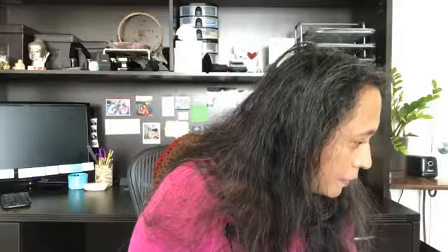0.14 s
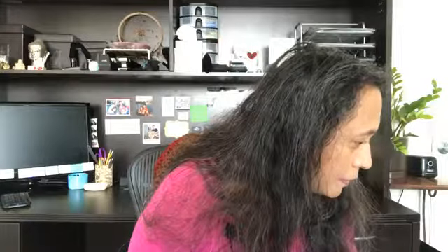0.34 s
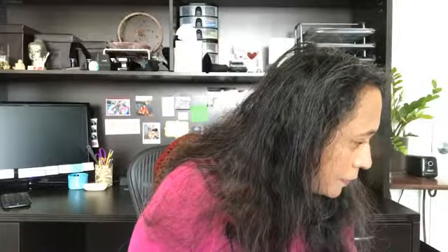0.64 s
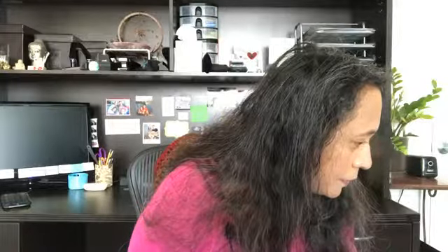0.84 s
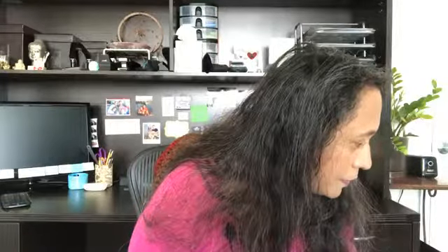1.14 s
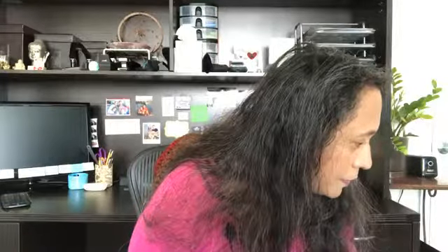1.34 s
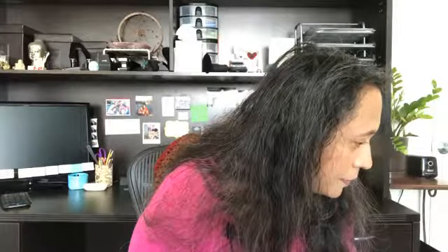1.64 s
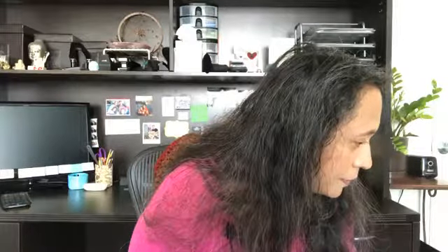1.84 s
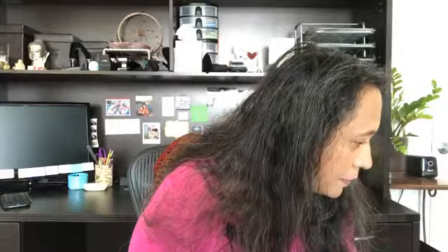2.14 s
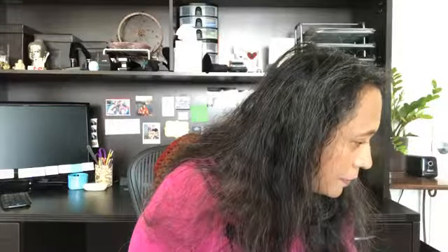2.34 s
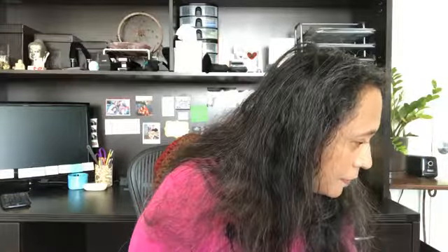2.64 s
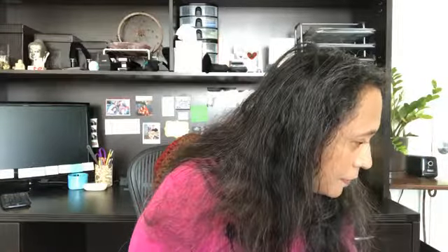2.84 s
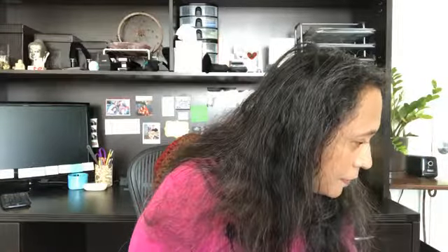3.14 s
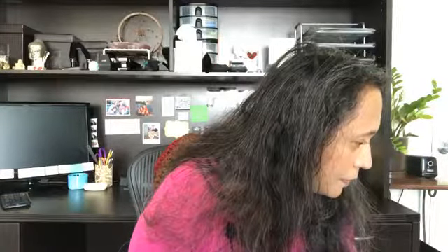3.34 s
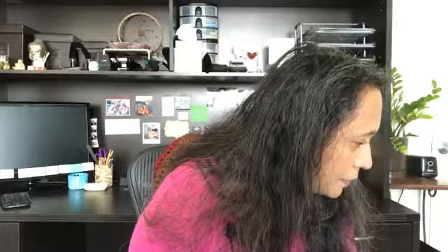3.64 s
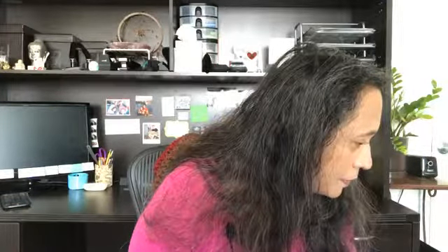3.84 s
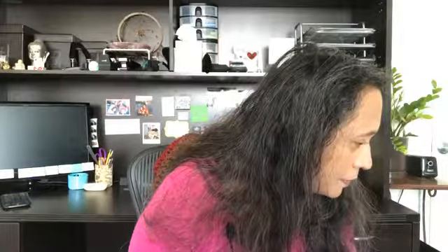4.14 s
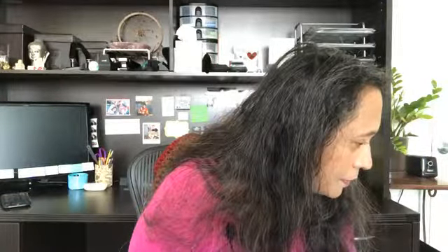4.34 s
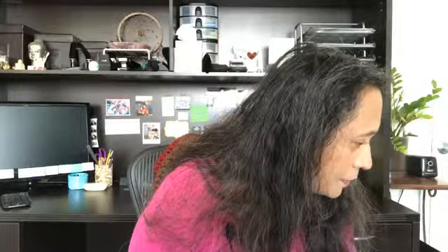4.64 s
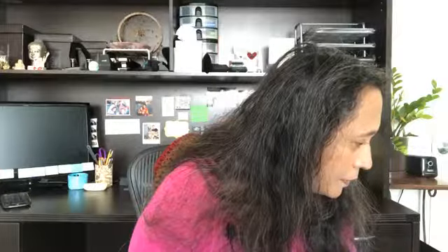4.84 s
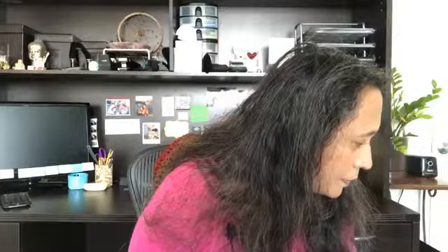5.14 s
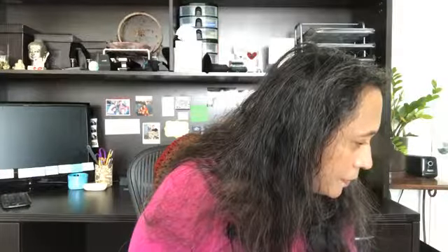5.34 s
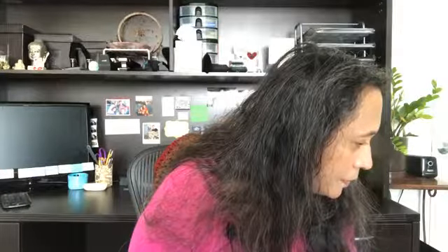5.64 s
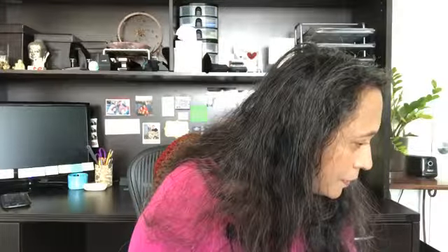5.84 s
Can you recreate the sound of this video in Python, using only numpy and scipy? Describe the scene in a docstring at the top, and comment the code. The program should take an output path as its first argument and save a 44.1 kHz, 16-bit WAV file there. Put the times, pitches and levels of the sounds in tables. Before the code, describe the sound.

In a quiet office, a low building rumble and soft fan hum run throughout, with a very faint electronic whine and sizzle. A deep drone dies away at the start. A computer mouse close to the microphone is then clicked three times, about two seconds apart, each a crisp plastic snap down and back up with a slight room echo. A few faint dry ticks fall around the clicks.

```python
"""A quiet office: a building rumbles, a fan hums, a thin whine swings in pitch and electronics sizzle
throughout. A deep drone dies away in the first second, and faint ticks come now and then. At about 1, 3 and 5
seconds a computer mouse is clicked close by. Each press snaps the plastic shell, pings the switch spring and
knocks on the desk. A tenth of a second later the button snaps back up with far less ring. The walls return both
snaps."""
import sys
import numpy as np
from scipy import signal
from scipy.fft import rfft, irfft, next_fast_len
from scipy.io import wavfile
from scipy.ndimage import uniform_filter1d

SR = 44100
rng = np.random.default_rng(int(sys.argv[2]) if len(sys.argv) > 2 else 0)


def unload_wav(signal):
    """Save mono or channel-first audio to the path in sys.argv[1] as 16-bit WAV at rate SR, clipped to [-1, 1]."""
    wavfile.write(
        sys.argv[1],
        SR,
        np.round(np.clip(np.atleast_2d(signal).T, -1, 1) * 32767).astype(np.int16),
    )


N = 264688
TIME = np.arange(N) / SR

# The button going down, and coming back up. A fade time is how long a sound takes to drop by 60 dB.
# (time [s], snap level [dB], spring level [dB], knock level [dB], rise time [s], fade time [s])
BUTTON_DOWN = [(1.0368, -25.5, -41, -31.5, .0002, .01), (3.0423, -27, -40, -32, .0002, .012),
               (4.9691, -26.5, -40, -31.5, .0002, .01)]
BUTTON_UP = [(1.1295, -22, -57, -31, .00005, .006), (3.1559, -22.5, -68, -31.5, 0.000042, 0.0074),
             (5.0431, -23, -67, -29.5, .0004, 0.0093)]
# How the plastic shell colours the snap going down, and coming up: (frequency [Hz], boost [dB])
SHELL_DOWN = [(150, -12.5), (400, -12), (1300, -13), (2700, -11.5), (3400, -4.5), (4100, -10), (5400, -4),
              (6900, -3.5), (7700, 9), (8800, -4.5), (9700, -1), (11300, -14), (11800, 1), (13000, -7),
              (14000, -8), (15700, -25)]
SHELL_UP = [(150, -16.5), (1300, -14.5), (2950, -14), (3330, -1.5), (3700, -6), (4150, -4), (4700, -8.5),
            (5600, -9.5), (6700, -3), (7950, 5.5), (8250, 2), (8580, 4.5), (8950, -0.5), (9500, -3.5),
            (11000, -10.5), (12400, -2.5), (13100, -2.5), (14200, -4), (15100, -1.5), (15750, -26)]
def button(snaps, shell, alike=0.91, size=4096):
    """Each snap rattles the shell in much the same way, a quick finger more crisply than a slow one."""
    out = np.zeros(N)
    usual = rng.standard_normal(size)
    for start, db, _, _, rise_s, fade_s in snaps:
        contacts = alike * usual + np.sqrt(1 - alike ** 2) * rng.standard_normal(size)
        add(out, start, amp(db) * snap(contacts, shell, fade_s, rise_s))
    return out


def snap(contacts, colour, fade_s, rise_s=.00003):
    """A burst of tiny hits builds up, dies away and takes on the colour of the thing that is hit."""
    size = len(contacts)
    t = np.arange(size) / SR
    rattle = np.fft.fft(contacts * (1 - np.exp(-t / rise_s)) * amp(-60 * t / fade_s))
    rattle /= np.sqrt(uniform_filter1d(abs(rattle) ** 2, 35, mode="wrap"))  # even out chance peaks
    log_gain = np.log(amp(look_up(colour, abs(np.fft.fftfreq(size, 1 / SR)))))
    response = np.exp(np.conj(signal.hilbert(log_gain)))  # rings after a hit, never before
    sound = np.fft.ifft(rattle * response).real
    return unit(sound * (1 - t / t[-1]) ** 2) / np.sqrt(size)


# The notes of the switch spring: (pitch [Hz], level [dB], fade time [s])
SPRING_NOTES = [(7260, -3.5, 0.051), (7140, -20.5, 0.3), (7256, -14, 0.22), (7290, -25, 0.33),
                (11620, -21, 0.071), (11937, -23, 0.12), (11800, -21, 0.12), (12683, -25, .22),
                (12916, -41, .22)]
def spring(damped_fade_s=.02):
    """A press rings the spring, whose close notes throb. The release stops it with a fainter ping."""
    out, ping = np.zeros(N), ring(SPRING_NOTES)
    t = TIME[:len(ping)]
    for (down, _, down_db, *_), (up, _, up_db, *_) in zip(BUTTON_DOWN, BUTTON_UP):
        since_release = np.maximum(t - (up - down), 0)
        add(out, down, amp(down_db - 60 * since_release / damped_fade_s) * ping)
        add(out, up, amp(up_db) * ping)
    return out


# The notes of the hollow mouse on the desk: (pitch [Hz], level [dB], fade time [s])
BODY_NOTES = [(194.7, -29.5, 0.065), (278, -37, 0.048), (765, -25.5, 0.017), (885, -20.5, 0.019)]
def knocks(rise_s=0.00019):
    """Every snap also knocks the hollow mouse and the desk, which take a moment to answer."""
    out, knock = np.zeros(N), ring(BODY_NOTES)
    knock *= 1 - np.exp(-TIME[:len(knock)] / rise_s)
    for start, _, _, knock_db, _, _ in BUTTON_DOWN + BUTTON_UP:
        add(out, start, amp(knock_db) * knock)
    return out


# The switch's little peg slips just before a snap: (time [s], level [dB], length [s])
PEG_SLIPS = [(1.0337, -44.5, 0.0028), (3.0403, -47, 0.0031), (3.1515, -45.5, 0.0034),
             (5.0396, -44.5, 0.0018), (5.042, -49, 0.0015)]
def slips(spring_hz=7280, scrape=0.55):
    """Rubbing swells for a moment and sets the spring singing."""
    out = np.zeros(N)
    rub = tone(spring_hz) + scrape * noise(SHELL_UP)
    for start, db, length in PEG_SLIPS:
        progress = np.clip((TIME - start) / length, 0, 1)
        out += amp(db) * rub * np.sin(np.pi * progress ** 2.7)
    return out


# Faint ticks around the clicks: (time [s], level [dB], pitch [Hz], spread in pitch [Hz])
FAINT_TICKS = [(0.135, -48.5, 4250, 1400), (0.202, -41, 4400, 5000), (1.4277, -41.5, 5200, 2400),
               (1.6702, -47.5, 3400, 4500), (1.794, -41, 4250, 2000), (2.4100, -42.5, 4400, 1100),
               (3.8867, -51, 4500, 1400), (5.1903, -48, 4100, 2300)]
def ticks(fizz_db=-11, fizz_hz=10000, fizz_width_hz=4000):
    """Small dry ticks, each ringing briefly at its own pitch under a little fizz."""
    out, hz = np.zeros(N), np.geomspace(100, 18000, 200)
    fizz = amp(fizz_db) / (1 + (2 * (hz - fizz_hz) / fizz_width_hz) ** 2)
    for start, db, pitch, width in FAINT_TICKS:
        peak = 1 / (1 + ((hz / pitch - pitch / hz) * pitch / width) ** 2)
        colour = np.c_[hz, 20 * np.log10(np.hypot(peak, fizz))]
        add(out, start, amp(db) * snap(rng.standard_normal(4096), colour, fade_s=0.014))
    return out


def bright_echo(sound, echo_db, delay_s=.0082, beam_hz=9450, width_hz=2100):
    """A hard surface nearby throws the click back, brightest where the button beams its treble."""
    out = np.zeros(N)
    beamed = signal.lfilter(*signal.iirpeak(beam_hz, beam_hz / width_hz, fs=SR), sound)
    add(out, delay_s, amp(echo_db) * (sound + 0.97 * beamed))
    return out


# Echoes from wall, ceiling and shelves: (delay [s], bass strength [ratio], treble strength [ratio])
ROOM_ECHOES = [(.0013, 0.09, 0.082), (.0048, 0.28, .05), (0.015, 0.41, 0.091), (0.0185, 0.47, .2),
               (0.0209, .6, .27)]
# How long the room keeps sounding: (frequency [Hz], fade time [s])
ROOM_FADE = [(200, 0.43), (900, 0.34), (4000, 0.31), (8000, 0.31), (13000, 0.21), (16000, 0.15)]
# The colour of that lingering sound: (frequency [Hz], boost [dB])
ROOM_COLOUR = [(200, 3), (650, -2), (1400, 1), (3200, -4), (4500, -2.5), (8000, -4), (9700, 3), (12600, 7),
               (14000, -1)]
def room(sound, tail_db, echo_db, build_s=0.0056, bass_below_hz=2000):
    """The sound arrives directly, then as a few echoes and a fading tail of many blurred together."""
    hz, t, bands = signal.stft(rng.standard_normal(SR // 2), SR, nperseg=256)
    band_db = look_up(ROOM_COLOUR, hz)[:, None] - 60 * t / look_up(ROOM_FADE, hz)[:, None]
    _, tail = signal.istft(bands * amp(band_db), SR, nperseg=256)
    tail *= 1 - np.exp(-(TIME[:len(tail)] / build_s) ** 2)
    out = sound + signal.fftconvolve(sound, amp(tail_db) * tail / np.linalg.norm(tail))[:N]
    bass = signal.lfilter(*signal.butter(1, bass_below_hz, fs=SR), sound)
    for delay, bass_gain, treble_gain in ROOM_ECHOES:
        add(out, delay, amp(echo_db) * (bass_gain * bass + treble_gain * (sound - bass)))
    return out


# Waves bouncing between the walls make some pitches of the whine louder: (pitch [Hz], level [dB])
WHINE_LOUDNESS = [(1922, -87), (1935, -88), (1947, -95), (1961, -101), (1974, -89), (1983, -90.5),
                  (1997, -95.5), (2011, -90.5)]
def whine(middle_hz=1967, swing_hz=44.12, period_s=1.98, lowest_at_s=1.32, flicker_db=2.5):
    """A thin whine swings slowly up and down in pitch while its level flickers."""
    turn = 2 * np.pi * (TIME - lowest_at_s) / period_s
    swing = -np.cos(turn + .13 * (1 - np.cos(turn)))  # climbs faster than it sinks
    pitch = middle_hz + swing_hz * swing
    return amp(look_up(WHINE_LOUDNESS, pitch) + flicker_db * drift(11)) * tone(pitch)


# The sizzle surges up, or sags down: (time [s], length [s], full pitch change [Hz])
SIZZLE_SURGES = [(0.199, .58, 450), (1.24, 1.12, 471), (2.649, .13, 480), (3.3, .2, 299.5),
                 (4.17, .28, 580), (4.548, 0.26, 558.5), (5.33, .5, -200), (5.871, 0.21, 404.5)]
# High tones that stay in place: (pitch [Hz], level [dB])
SIZZLE_TONES = [(8760, -93), (8940, -88), (9120, -93), (9220, -89.5), (9300, -89.5), (9400, -85.5),
                (9615, -88), (9790, -95.5)]
# The colour of the high hiss around them: (frequency [Hz], boost [dB])
SIZZLE_COLOUR = [(7500, -29), (8450, -5.5), (8750, 2.5), (9400, -2.5), (9900, -0.5), (10400, -2.5),
                 (11200, -21)]
def sizzle(rest_hz=9430, rest_db=-81.5, db_per_hz=0.0076, glide_s=.12, waver_hz=80, width_hz=340):
    """Electronics sizzle over faint tones and hiss, growing louder as the pitch surges upward."""
    rise_hz = np.zeros(N)
    for start, length, hz in SIZZLE_SURGES:
        inside_s = np.minimum(TIME - start, start + length - TIME)
        rise_hz += hz * np.clip(.5 + inside_s / glide_s, 0, 1)
    pitch = rest_hz + rise_hz + waver_hz * drift(12)
    # fast random wobble smears the tone into a narrow band of noise
    band = unit(drift(width_hz) * tone(pitch) + drift(width_hz) * tone(pitch, np.pi / 2))
    tones = sum(amp(db) * tone(hz, 0.97 * drift(25)) for hz, db in SIZZLE_TONES)
    return amp(rest_db + db_per_hz * rise_hz) * band + tones + amp(-79.5) * noise(SIZZLE_COLOUR)


# The colours of the building's rumble and of the air and microphone hiss: (frequency [Hz], boost [dB])
RUMBLE_COLOUR = [(1.5, 5.5), (5, 7), (11, 3.5), (18, -7.5), (27, -12), (38, -12.5), (55, -21), (70, -26),
                 (85, -25.5), (100, -31), (140, -37), (250, -45), (600, -83)]
HISS_COLOUR = [(30, 4.5), (200, 9), (350, 13), (750, 10.5), (950, 7), (1400, 7), (2200, 1.5), (3300, -1),
               (4200, 0), (6000, -1.5), (8400, 0), (11300, -3), (13500, -4.5), (15800, -11)]
# The tones in the fan's hum: (pitch [Hz], level [dB])
FAN_TONES = [(114, -81), (176, -96), (236, -91.5), (705, -92.5), (797, -95), (1092, -94), (1175, -96),
             (1222, -98)]
def building(drone_hz=41.97, drone_hold_s=0.35, fall_db_per_s=150):
    """Lumpy rumble, a wavering fan hum and a deep drone that soon dies away, over an even hiss."""
    rumble = amp(-44 + 1.2 * drift(5)) * noise(RUMBLE_COLOUR)
    hum = sum(amp(db + 2.5 * drift(4.1)) * tone(hz, 1.16 * drift(6)) for hz, db in FAN_TONES)
    drone = amp(-52.5 - fall_db_per_s * np.maximum(TIME - drone_hold_s, 0)) * tone(drone_hz)
    hiss = amp(-73 + 0.24 * drift(17)) * noise(HISS_COLOUR)
    return rumble + hum + drone + hiss


def amp(db):
    """Turns decibels into a number to multiply a sound by."""
    return 10 ** (np.asarray(db) / 20)


def unit(x):
    """Scales a signal to an average strength (rms) of 1."""
    return x / np.sqrt(np.mean(x ** 2) + 1e-30)


def look_up(table, hz):
    """Reads between the rows of a frequency table, giving each octave equal room."""
    row_hz, value = np.transpose(table)
    return np.interp(np.log(hz + 0.00092), np.log(row_hz), value)


def add(mix, start_s, sound):
    """Mixes a sound in at the given time."""
    part = mix[max(round(start_s * SR), 0):][:len(sound)]
    part += sound[:len(part)]


def noise(colour):
    """Steady noise of strength 1. Its colour is its balance of low and high frequencies."""
    size = next_fast_len(N, real=True)
    gain = amp(look_up(colour, np.fft.rfftfreq(size, 1 / SR)))
    return unit(irfft(rfft(rng.standard_normal(size)) * gain, size)[:N])


def drift(rate_hz, size=16384):
    """A smooth random wobble of strength 1, up to about rate_hz wiggles a second."""
    t = np.linspace(0, TIME[-1], size)
    keep_slow = np.exp(-(np.fft.rfftfreq(size, t[1]) / rate_hz) ** 2)
    wobble = irfft(rfft(rng.standard_normal(size)) * keep_slow)
    return np.interp(TIME, t, unit(wobble))


def tone(hz, phase=0):
    """A pure tone of strength 1 that follows a pitch."""
    return np.sqrt(2) * np.sin(2 * np.pi * np.cumsum(hz * np.ones(N)) / SR + phase)


def ring(notes, size=8192):
    """The notes of a struck object, each fading at its own speed."""
    t = np.arange(size) / SR
    return sum(amp(db - 60 * t / fade_s) * np.sin(2 * np.pi * hz * t) for hz, db, fade_s in notes)


def scene():
    """The mouse and the ticks sound into the room, over the building and the electronics."""
    press, release = button(BUTTON_DOWN, SHELL_DOWN), button(BUTTON_UP, SHELL_UP)
    down = room(press, tail_db=-1.5, echo_db=-10) + bright_echo(press, echo_db=-11.5)
    up = room(release, tail_db=-1.5, echo_db=-5.5) + bright_echo(release, echo_db=-9.5)
    ping = room(spring(), tail_db=-7.5, echo_db=-15)
    body = room(knocks(), tail_db=-2.5, echo_db=-4)
    small = room(slips() + ticks(), tail_db=-10, echo_db=-8)
    small += bright_echo(small, echo_db=-18)
    return (down + up + ping + body + small + building() + whine() + sizzle())[None]


def record(dry):
    """Softens both ends and cuts away the very highest treble."""
    faded = dry * signal.windows.tukey(N, .004)
    treble_cut = signal.firwin(511, cutoff=15780, window=("kaiser", 9), fs=SR)
    return signal.oaconvolve(faded, treble_cut[None], "same")


dry = scene()
out = record(dry)
unload_wav(out)
```